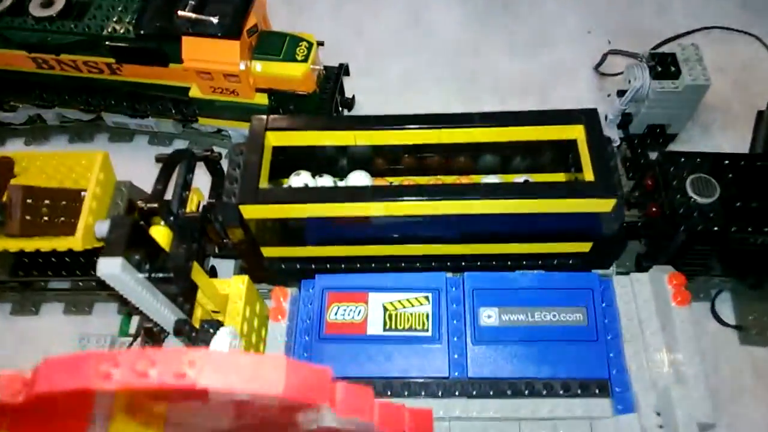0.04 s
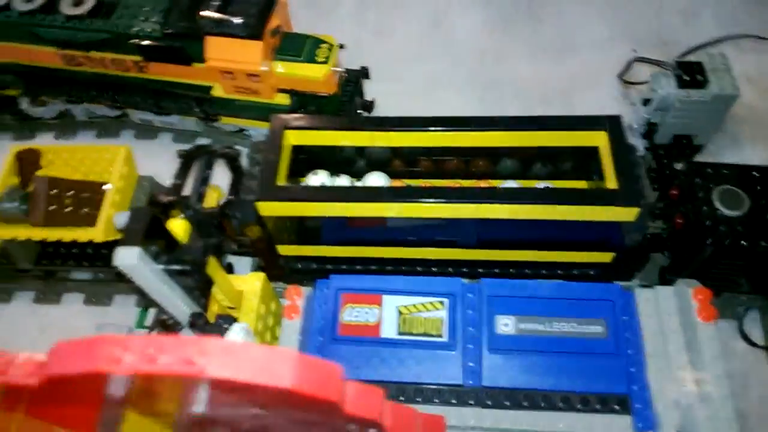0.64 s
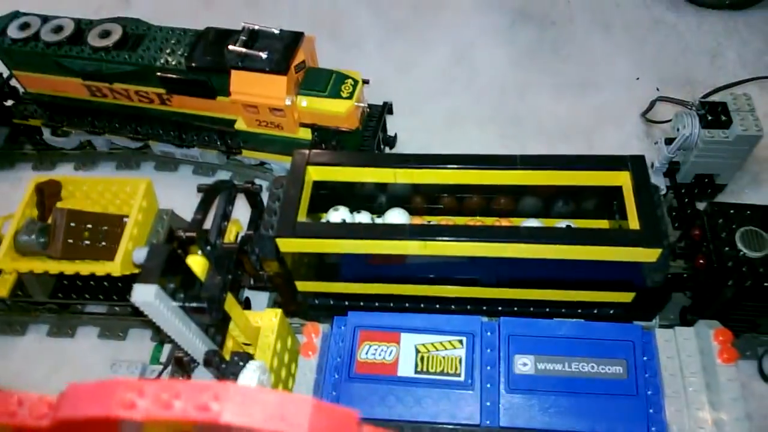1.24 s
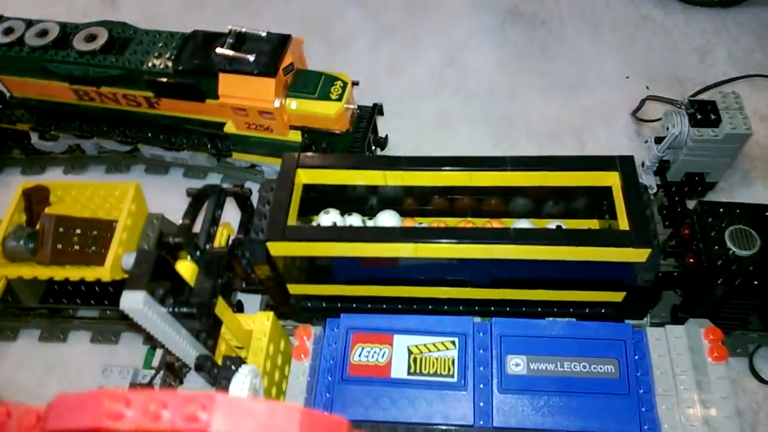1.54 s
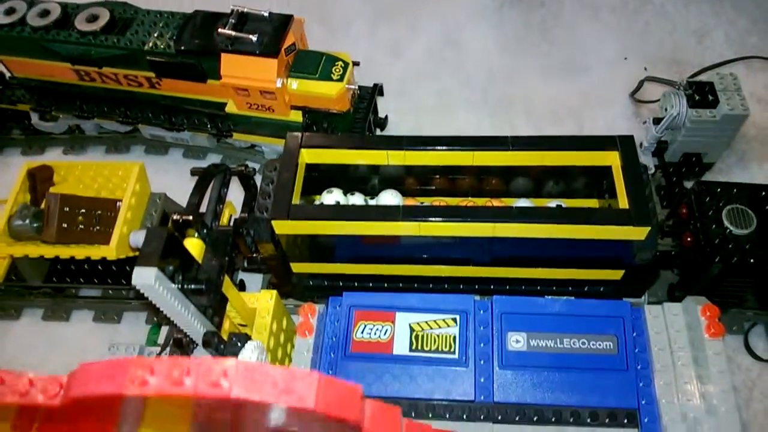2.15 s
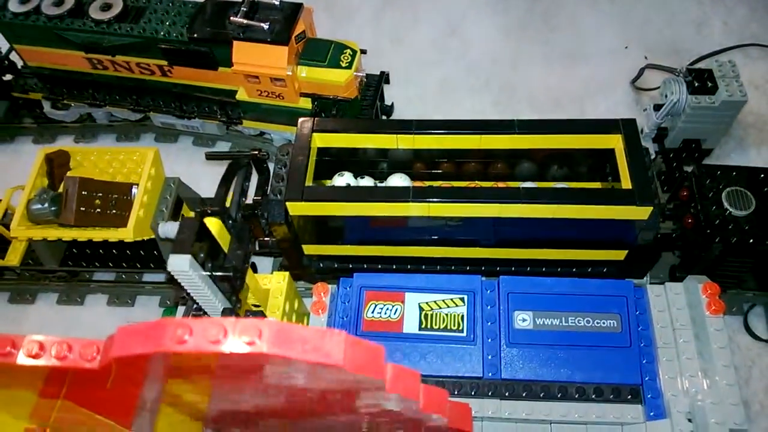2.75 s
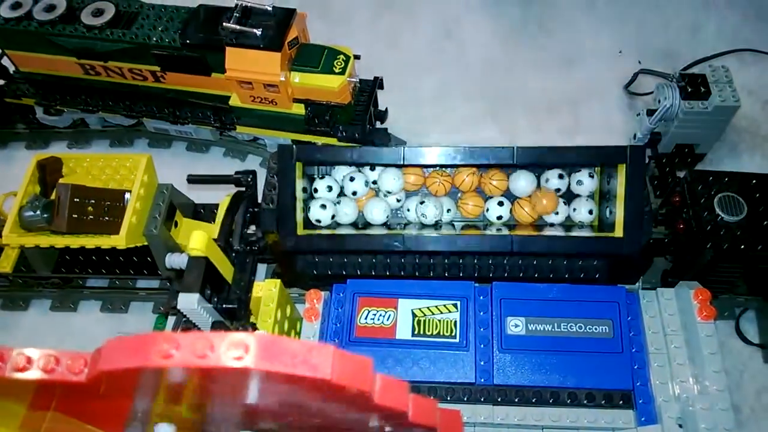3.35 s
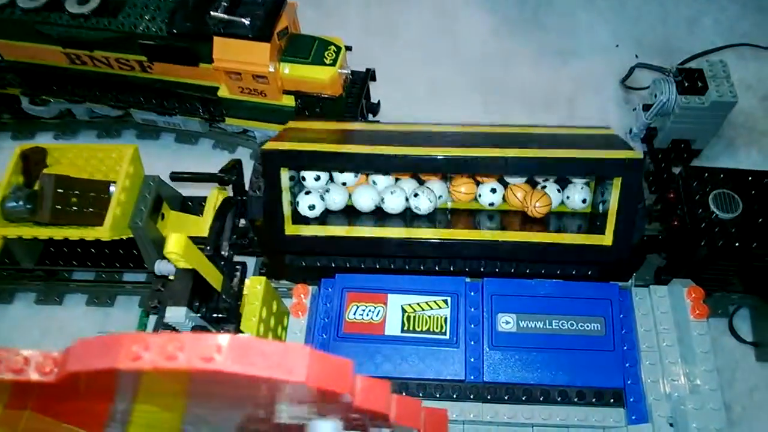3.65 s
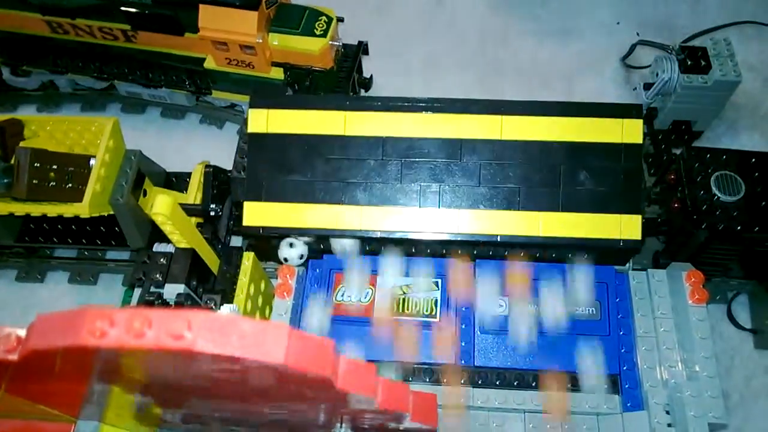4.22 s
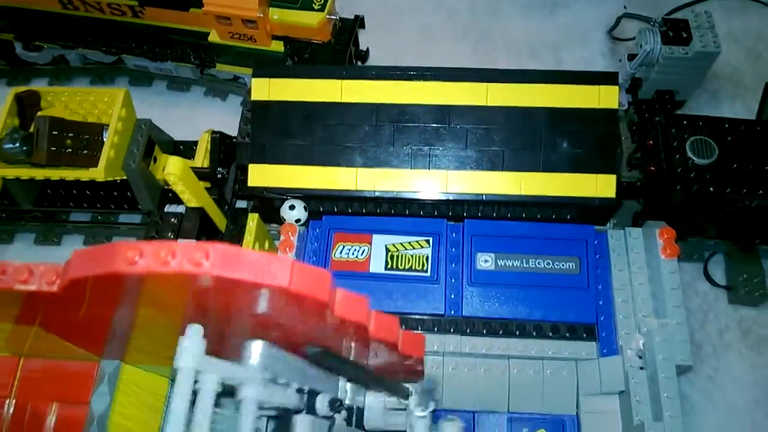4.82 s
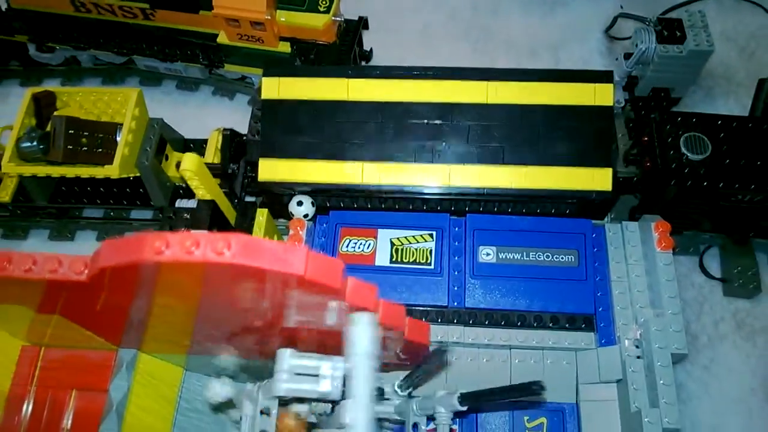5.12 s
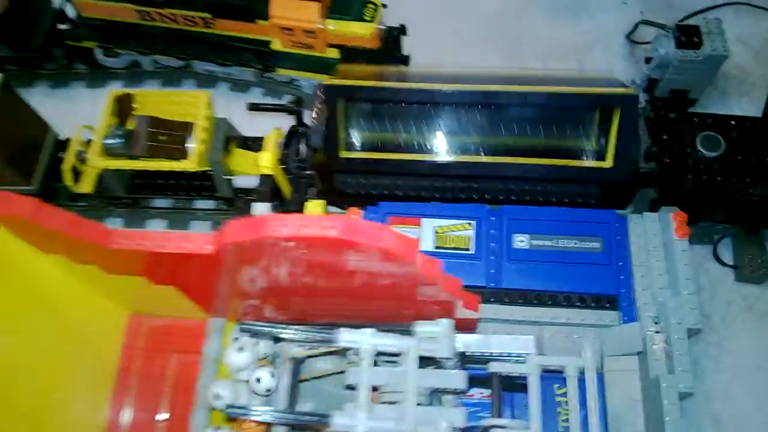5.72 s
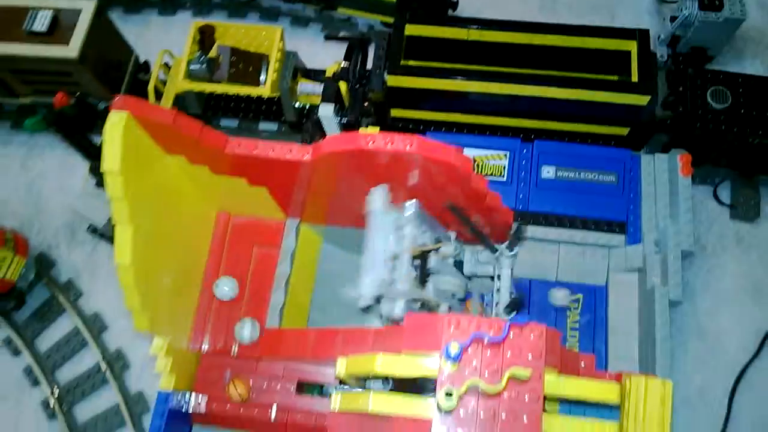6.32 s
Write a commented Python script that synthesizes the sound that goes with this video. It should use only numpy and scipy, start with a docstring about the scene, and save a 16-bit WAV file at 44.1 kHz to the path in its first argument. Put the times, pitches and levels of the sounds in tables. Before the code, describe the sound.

Close by in a small room, the plastic gears of a motorised toy brick machine skip about nine times a second, scraping and rattling in four runs with short breaks. Midway a bin turns over, and little hard balls shift and pour onto a ringing plastic ramp. They roll on, a lift thuds once on the hollow base, and the clicking resumes with more balls clattering. A faint motor hum lies underneath.

```python
"""Plastic gears skipping about nine times a second, in runs with short breaks: a motorised toy brick
machine on a table, close by in a small room. Each skip is a scrape of tooth over tooth, then a rattle
of loose parts. Midway a bin turns over; its little balls shift, pour onto a ringing plastic ramp,
roll down and are lifted on. The lift thuds once on the hollow base.
Underneath: room air, a faint motor hum and a thin hiss that comes and goes."""
import sys
import numpy as np
from scipy import signal
from scipy.fft import rfft, irfft
from scipy.io import wavfile
from scipy.ndimage import uniform_filter1d

SR = 44100
rng = np.random.default_rng(int(sys.argv[2]) if len(sys.argv) > 2 else 0)


def to_wav(s):
    """Save 16-bit WAV."""
    ch = np.atleast_2d(s).T  # columns
    pcm = np.round(np.clip(ch, -1, 1) * 32767)  # PCM
    wavfile.write(sys.argv[1], SR, pcm.astype(np.int16))


N = 285327

# Levels are relative within a table; the functions set the mix.
# Spectra: (frequency [Hz], level [dB])
AIR_SPECTRUM = [(25, -2.5), (70, 1), (130, -9.5), (300, -5), (550, -1), (800, -4.5), (1300, -5),
                (4000, -14.5), (5000, -2), (6000, -19), (9500, -15), (12000, -43), (16000, -26)]
HISS_SPECTRUM = [(300, -10), (2000, -9.5), (6000, -11), (6900, -4.5), (7800, -17), (12000, -18),
                 (13400, -12), (14000, -4.5), (14450, -13), (15000, -12), (16000, -23)]
TABLETOP_SPECTRUM = [(20, -4), (60, 1), (120, 2), (220, 1), (400, -1), (1500, -43), (16000, -80)]
BIN_SPECTRUM = [(150, -34), (500, -31), (1000, -15), (1300, 2), (1480, 3), (1750, 1.5), (2150, -14),
                (3000, -4.5), (4200, -9), (6000, -17.5), (16000, -39)]
RAMP_SPECTRUM = [(40, -34), (190, -25.5), (270, -12), (500, -6), (700, 3), (950, 0), (1300, -2.5),
                 (1850, 0.5), (2600, -7), (4500, -8), (6500, -14.5), (10000, -21.5), (16000, -29)]
CLICK_SPECTRUM = [(300, -36), (1500, -10), (3200, 16.5), (5000, -13), (7000, 4), (10000, -2.5), (14000, -2),
                  (16000, -10)]
CHANNEL_SPECTRUM = [(150, -31), (400, -8.5), (800, -2), (1600, 3), (2300, -4.5), (3500, -6), (5000, -9.5),
                    (7000, -14.5), (10000, -25), (16000, -39)]
AXLE_SPECTRUM = [(150, -25.5), (600, -13.5), (1080, -4.5), (1450, -14), (1900, 1), (2300, 2), (3600, -2.5),
                 (4800, 1), (6000, -16), (8000, -15), (11000, -24.5), (16000, -28.5)]
SNAP_SPECTRUM = [(150, -33), (600, -23.5), (1100, -16.5), (1500, -18), (2200, -3), (3500, -2), (4800, 10.5),
                 (5900, -5.5), (9000, -6), (12000, -17), (16000, -33)]
RATTLE_SPECTRUM = [(150, -36.5), (500, -21), (1100, -11.5), (1450, -13.5), (2200, -4.5), (3600, -4.5),
                   (4300, -1), (4800, 4), (5600, -13), (8000, -14.5), (11000, -21), (16000, -27.5)]
SCRAPE_SPECTRUM = [(150, -54), (500, -25.5), (800, -28), (1120, -12), (1500, -21.5), (2100, -2), (2600, -8),
                   (3600, -5.5), (4250, 0.5), (4900, 2), (5800, -9.5), (9200, -8), (11000, -18),
                   (16000, -35)]
# Room decay: (frequency [Hz], T60 [s])
ROOM_DECAY = [(200, 0.15), (1000, 0.34), (4000, 0.06), (12000, 0.16)]
# Modes: (frequency [Hz], level [dB], T60 [s])
BASE_MODES = [(432, -2.5, 0.066), (474, 2, 0.052), (593, -4, 0.035)]
RAMP_MODES = [(320, -14, 0.18), (386, 2, 0.16), (581, 3, 0.24), (616, 3, 0.17), (701, -4.5, 0.26),
              (904, -11.5, 0.26), (873, -15, 0.14), (1254, -4.5, 0.08), (1370, -8, 0.3), (1670, -21, 0.079),
              (1670, -21, 0.1), (1932, 9, 0.11), (2600, -46, 0.16)]
# Spans of activity: (time [s], length [s], level [dB])
HISS_SPANS = [(0.0, 0.7, -58), (1.57, 0.93, -62), (2.52, 0.9, -51), (3.45, 0.9, -50), (5.03, 1.1, -50.5)]
HEAP_SLIDES = [(3.255, 0.01, -50), (3.335, 0.034, -29.5), (3.455, 0.01, -41), (3.55, 0.085, -44),
               (3.87, 0.13, -36.5), (4.03, 0.12, -25.5)]
RAMP_SPILLS = [(4.05, 0.22, -33), (4.285, 0.22, -25), (4.57, 0.098, -29.5), (4.795, 0.035, -32),
               (5.69, 0.067, -32), (5.86, 0.064, -34), (5.975, 0.057, -27), (6.1, 0.14, -35),
               (6.335, 0.018, -32)]
CHANNEL_ROLLS = [(4.92, 0.1, -43), (5.07, 0.18, -39), (5.44, 0.12, -47)]
FREE_SPINS = [(0.0, 0.0076, -22.5), (0.83, 0.028, -30), (0.97, 0.031, -37), (1.567, 0.049, -33.5),
              (2.01, 0.034, -32), (2.915, 0.085, -30.5), (3.523, 0.083, -29.5), (3.96, 0.029, -33),
              (4.07, 0.06, -27), (4.88, 0.045, -29.5), (6.29, 0.02, -27.5)]
# Jolts into the tabletop: (time [s], level [dB])
TABLETOP_JOLTS = [(4.15, -56), (4.388, -53), (4.459, -51), (4.576, -50), (4.599, -51), (5.71, -56.5),
                  (6.021, -58), (6.207, -53.5)]
# Single impacts: (time [s], level [dB], treble tilt [dB])
BIN_BUMPS = [(3.258, -31, -13), (3.305, -45, -10), (3.344, -28, -14), (3.358, -25, -8),
             (3.418, -21.5, -2.5), (3.446, -34, 2), (3.461, -34, -3), (3.547, -25, 3), (3.604, -26.5, -5),
             (4.037, -19, -21), (4.069, -32, -4), (4.11, -16, 12)]
RAMP_KNOCKS = [(4.2004, -20, 7), (4.2946, -19.5, 6), (4.3135, -12, -2), (4.3361, -14, 9), (4.3455, -10, 3),
               (4.3936, -8, 1), (4.4077, -16.5, 28), (4.4233, -16, -11), (4.4407, -12.5, 5.5),
               (4.4636, -21, 5), (4.4888, -20, -3), (4.5297, -17, 13), (4.5761, -14, 8),
               (4.6599, -19.5, -10), (4.798, -21, 6), (4.8109, -24.5, 16), (4.9844, -32, 6),
               (5.0685, -28.5, 4), (5.2655, -28, 5), (5.2892, -23.5, 0), (5.3629, -23.5, 7),
               (5.3999, -30, -1), (5.4376, -31.5, -8), (5.464, -31.5, -9), (5.4903, -32, -6),
               (5.9499, -20, 2), (5.9828, -20, 3), (5.9863, -19.5, 3), (6.0397, -14.5, 8),
               (6.2652, -17.5, 9)]
SNAPS_AND_CLICKS = [(0.0029, -17.5, -10), (0.1196, -20, 12), (0.2281, -17, -3.1), (0.3446, -15, 1),
                    (0.4161, -23.5, -13), (0.5071, -34, -13), (0.5767, -13.5, 7), (0.7021, -22.5, -8),
                    (0.8078, -18, -6), (0.8326, -20, -8), (0.9296, -17.5, -3.5), (1.0927, -33, -9),
                    (1.1974, -31.5, -12), (1.2495, -49, -6), (1.5697, -24, -7), (1.5831, -23, -8),
                    (1.601, -24.5, -7), (1.6286, -20.5, -8.5), (1.6999, -11, -6), (1.8408, -16.5, -9),
                    (1.8989, -26.5, -0.3), (2.017, -14, 13), (2.027, -20, -13), (2.0582, -9.5, -3),
                    (2.1829, -20, -2), (2.2957, -17.5, -0.8), (2.3682, -31, -8), (2.4114, -11.5, -6),
                    (2.4407, -25, -7), (2.5393, -18.5, 2), (2.647, -13, -5.5), (2.8374, -19, -8),
                    (2.918, -20.5, 12), (2.9772, -21, -7), (3.137, -16, -1), (3.5749, -19.5, -7),
                    (3.6042, -19, -12), (3.6484, -24, -9), (3.7769, -20.5, -2), (3.9168, -10.5, -4),
                    (3.9398, -13.5, -10), (4.0576, -9.5, -1), (4.1776, -13, -14), (5.6913, -17, 13),
                    (5.7096, -15, 23), (5.7202, -17, 26), (5.8781, -16, 18), (6.0777, -15, 44),
                    (6.2032, -14, 37), (6.2188, -14.5, 21), (6.3415, -17, 8)]
# Motor on: (time [s], length [s], chatter level [dB], hum level [dB])
MOTOR_RUNS = [(0.0, 1.1, -42, -70.5), (1.59, 1.39, -42, -68.5), (3.511, 1.34, -41, -67.5),
              (5.52, 0.97, -42.5, -71.5)]
# Gear skips: (time [s], length [s], scrape level [dB], rattle level [dB])
GEAR_SKIPS = [(0.079, 0.013, -17, -25.5), (0.199, 0.018, -17, -26.5), (0.307, 0.017, -17, -26.5),
              (0.427, 0.014, -18.5, -27), (0.543, 0.017, -16.5, -29), (0.66, 0.013, -17, -31),
              (0.778, 0.011, -17, -35.5), (0.89, 0.019, -18, -29), (1.023, 0.011, -19, -51),
              (1.683, 0.0092, -17.5, -28.5), (1.813, 0.011, -20.5, -30), (1.926, 0.02, -21, -27.5),
              (2.043, 0.019, -20, -28), (2.145, 0.018, -19, -28), (2.269, 0.0099, -17, -29.5),
              (2.387, 0.015, -20, -30.5), (2.497, 0.021, -18, -26), (2.616, 0.014, -18, -28.5),
              (2.732, 0.026, -19.5, -26.5), (2.85, 0.013, -19, -27), (3.049, 0.011, -20.5, -43.5),
              (3.675, 0.013, -18.5, -26.5), (3.793, 0.015, -18, -25), (3.909, 0.013, -17, -26.5),
              (4.029, 0.017, -18, -30), (4.139, 0.025, -19.5, -24.5), (4.258, 0.017, -17.5, -32),
              (4.365, 0.025, -21.5, -25), (4.488, 0.014, -18.5, -28), (4.597, 0.021, -21.5, -22.5),
              (4.72, 0.021, -20.5, -28), (4.836, 0.031, -21, -30.5), (5.547, 0.006, -19.5, -27),
              (5.661, 0.012, -18.5, -27.5), (5.776, 0.018, -18, -30.5), (5.89, 0.02, -19.5, -29.5),
              (6.009, 0.023, -17, -30), (6.118, 0.024, -21, -27), (6.233, 0.017, -21, -27.5),
              (6.35, 0.021, -19, -27.5)]


def gain_of(db):
    """Decibels to amplitude factor."""
    return 10 ** (np.asarray(db) / 20)


def unit_rms(x):
    """Scale to rms 1."""
    return x / np.sqrt(np.mean(x ** 2) + 1e-20)


def wander(count, width):
    """Noise smoothed over width points; rms 1."""
    return unit_rms(uniform_filter1d(rng.standard_normal(count), size=width))


def lookup(table, hz):
    """Interpolate over log frequency."""
    table_hz, value = np.transpose(table)
    return np.interp(np.log(hz + 1), np.log(table_hz + 1), value)


def add(mix, time_s, sound):
    """Mix a sound in at time_s."""
    part = mix[max(round(time_s * SR), 0):][:len(sound)]
    part += sound[:len(part)]


def envelope(spans, rise_s, fall_s):
    """Gain per sample: each span rises, holds and decays; powers add."""
    power = np.zeros(N)
    for time_s, length_s, db in spans:
        t = np.arange(N) / SR
        gain = gain_of(db) * np.minimum(t / rise_s, 1) * np.exp(-np.maximum(t - length_s, 0) / fall_s)
        add(power, time_s, gain ** 2)
    return np.sqrt(power)


def body(spectrum, tilt_db=0., ripple_db=0., size=2048):
    """Minimum-phase response, energy 1; tilt pivots at 3 kHz, ripple adds narrow random modes."""
    hz = np.fft.rfftfreq(size, 1 / SR)
    modes = wander(len(hz), 7)
    lean = np.tanh(np.log((hz + 1) / 3000))
    detune = np.exp(0.0054 * ripple_db * rng.standard_normal())  # varies with contact point
    level_db = lookup(spectrum, hz * detune) + tilt_db * lean + ripple_db * modes
    cepstrum = irfft(np.log(gain_of(level_db)))
    cepstrum[1:size // 2] *= 2
    cepstrum[size // 2 + 1:] = 0
    response = irfft(np.exp(rfft(cepstrum)))
    return response / np.linalg.norm(response)


def coloured_noise(spectrum, count=N, tilt_db=0., ripple_db=0.):
    """White noise shaped by a spectrum."""
    return signal.oaconvolve(rng.standard_normal(count), body(spectrum, tilt_db, ripple_db))[:count]


def buzz(decay_s, shape=0.99):
    """Force of a loose plastic contact, energy 1; shape above 1 holds, then stops short."""
    t = np.arange(SR // 25) / SR
    force = rng.standard_normal(len(t)) * np.exp(-(t / decay_s) ** shape)
    return force / np.linalg.norm(force)


def clatter(gain, spectrum, rate_hz, spread_db, decay_s, ripple_db, parts=8):
    """Random small impacts on several like parts; rms follows gain."""
    hits = rng.random(N) < rate_hz / SR
    force = hits * gain_of(spread_db * np.minimum(rng.exponential(1, N), 3))
    local_power = abs(uniform_filter1d(force ** 2, size=1500))
    force /= np.sqrt(local_power + .1 * np.mean(force ** 2))  # evens out the loudness of the random hits
    struck = rng.integers(0, parts, N)
    out = np.zeros(N)
    for part in range(parts):
        ring = np.convolve(buzz(decay_s), body(spectrum, ripple_db=ripple_db))
        out += signal.oaconvolve(force * gain * (struck == part), ring / np.linalg.norm(ring))[:N]
    return out


def impacts(rows, spectrum, decay_s, ripple_db, crack, shape):
    """A crack and a short buzz through a body, each scaled by the rms of its first 3 ms."""
    out = np.zeros(N)
    for time_s, db, tilt_db in rows:
        force = buzz(decay_s, shape)
        force[0] += crack
        sound = signal.fftconvolve(force, body(spectrum, tilt_db, ripple_db))
        onset_rms = np.sqrt(np.mean(sound[:3 * SR // 1000] ** 2))
        add(out, time_s, gain_of(db) * sound / onset_rms)
    return out


def room_tail(x, rise_s=0.0041):
    """Short diffuse tail; each band decays at its own rate."""
    hz, t, bands = signal.stft(rng.standard_normal(SR // 2), SR, nperseg=256)
    t60_s = lookup(ROOM_DECAY, hz)[:, None]
    tail = signal.istft(bands * gain_of(-60 * t / t60_s), SR, nperseg=256)[1]
    tail *= np.minimum(np.arange(len(tail)) / SR / rise_s, 1)
    return signal.fftconvolve(x, tail / np.linalg.norm(tail))[:N]


def room_air(level_db=-58.5):
    """Steady noise of still air."""
    return gain_of(level_db) * coloured_noise(AIR_SPECTRUM)


def hiss():
    """Thin high hiss, on and off."""
    return envelope(HISS_SPANS, rise_s=0.071, fall_s=0.073) * coloured_noise(HISS_SPECTRUM)


def motor_hum(pitch_hz=177, swell_db=1.5):
    """The running motor hums, wavering in pitch and level."""
    hz = pitch_hz * (1 + 0.025 * wander(N, 4000))
    swell = gain_of(swell_db * wander(N, 12000))
    runs = [(time_s, length_s, db) for time_s, length_s, _, db in MOTOR_RUNS]
    tone = np.sqrt(2) * np.sin(2 * np.pi * np.cumsum(hz) / SR)
    return envelope(runs, rise_s=0.011, fall_s=0.21) * swell * tone


def tabletop_jolts():
    """Heavy jolts shake the table."""
    out = np.zeros(N)
    for time_s, db in TABLETOP_JOLTS:
        shake = signal.fftconvolve(buzz(decay_s=0.0062), body(TABLETOP_SPECTRUM))
        add(out, time_s, gain_of(db) * unit_rms(shake))
    return out


def lift_thud(time_s=5.362, gain_db=-22, rise_s=0.0045):
    """The lift lands; the hollow base rings."""
    out, t = np.zeros(N), np.arange(SR // 5) / SR
    ring = sum(gain_of(db - 60 * t / t60_s) * np.sin(2 * np.pi * hz * t) for hz, db, t60_s in BASE_MODES)
    onset = 1 - np.exp(-(t / rise_s) ** 2)
    add(out, time_s, gain_of(gain_db) * ring * onset)
    return out


def balls_in_channel():
    """Balls roll along the lift's channel."""
    gain = envelope(CHANNEL_ROLLS, rise_s=0.01, fall_s=0.012)
    return clatter(gain, CHANNEL_SPECTRUM, rate_hz=970, spread_db=4, decay_s=0.0013, ripple_db=1.5)


def balls_in_bin():
    """The heap slides as the bin turns; single balls strike the wall."""
    slide = envelope(HEAP_SLIDES, rise_s=0.0034, fall_s=0.018)
    shifting = clatter(slide, BIN_SPECTRUM, rate_hz=490, spread_db=3, decay_s=0.0016, ripple_db=3)
    bumps = impacts(BIN_BUMPS, BIN_SPECTRUM, decay_s=0.0031, ripple_db=1, crack=0.13, shape=0.76)
    return gain_of(-2) * shifting + gain_of(-4) * bumps


def ramp_ring(strikes):
    """The ramp's plate modes ring on after each strike."""
    t = np.arange(SR // 4) / SR
    response = np.zeros(len(t))
    for hz, db, t60_s in RAMP_MODES:
        unit_peak = 2 * np.log(1000) / (t60_s * SR)  # cancels the gain at resonance
        response += unit_peak * gain_of(db - 60 * t / t60_s) * np.sin(2 * np.pi * hz * t)
    return signal.fftconvolve(strikes, response)[:N]


def balls_on_ramp():
    """Batches of hard balls hit the ramp, bounce and click together."""
    spill = envelope(RAMP_SPILLS, rise_s=0.0053, fall_s=0.084)
    pour = clatter(spill, RAMP_SPECTRUM, rate_hz=450, spread_db=2, decay_s=0.0014, ripple_db=2.5,
                   parts=14)
    clicks = clatter(spill, CLICK_SPECTRUM, rate_hz=170, spread_db=15.5, decay_s=0.0014, ripple_db=1.5)
    knocks = impacts(RAMP_KNOCKS, RAMP_SPECTRUM, decay_s=0.0016, ripple_db=2.5, crack=0.2, shape=0.87)
    strikes = gain_of(1.5) * pour + gain_of(-3) * knocks
    return strikes + gain_of(-5.5) * ramp_ring(strikes) + gain_of(-1) * clicks


def axle_chatter(spin_up_s=0.042):
    """Axles chatter under the motor, harder after each skip and when spinning free of the load."""
    runs = [(time_s, length_s, db) for time_s, length_s, db, _ in MOTOR_RUNS]
    coasts = [(time_s, spin_up_s, rattle_db - 4.5) for time_s, _, _, rattle_db in GEAR_SKIPS]
    idle = envelope(runs, rise_s=0.011, fall_s=0.024)
    coast = envelope(coasts, rise_s=spin_up_s, fall_s=0.045)
    free = envelope(FREE_SPINS, rise_s=0.0041, fall_s=0.018)
    gain = gain_of(-3.5) * np.sqrt(idle ** 2 + coast ** 2 + free ** 2)
    return clatter(gain, AXLE_SPECTRUM, rate_hz=700, spread_db=4, decay_s=0.0044, ripple_db=0, parts=6)


def snaps_and_clicks():
    """Single sharp snaps of the gears; near the end, bright hard clicks of balls entering the lift."""
    hits = impacts(SNAPS_AND_CLICKS, SNAP_SPECTRUM, decay_s=0.0031, ripple_db=0.45, crack=0.12,
                   shape=1.3)
    return gain_of(-4.5) * hits


def gear_rattle(hold_s=0.044, fall_s=0.015):
    """After each skip the gear train springs back and rattles until it settles."""
    gain, t = np.zeros(N), np.arange(SR // 7) / SR
    for time_s, length_s, _, db in GEAR_SKIPS:
        onset = np.clip(2 * t / length_s - 1, 0, 1)
        settle = np.exp(-np.maximum(t - hold_s, 0) / fall_s)
        add(gain, time_s, gain_of(db) * onset * settle)
    return clatter(gain, RATTLE_SPECTRUM, rate_hz=600, spread_db=4, decay_s=0.0017, ripple_db=1.5)


def gear_scrapes(lead_s=0.0038, fall_s=0.0042, grain=0.19):
    """Tooth rides over tooth: dense friction bites, holds and lets go."""
    out, t = np.zeros(N), np.arange(SR // 12) / SR
    for time_s, length_s, db, _ in GEAR_SKIPS:
        bite = np.minimum(t / (2 * lead_s), 1) ** 2.17
        release = np.exp(-np.maximum(t - lead_s - 0.91 * length_s, 0) / fall_s)
        grip = np.exp(grain * wander(len(t), 60))
        friction = coloured_noise(SCRAPE_SPECTRUM, len(t), 1.2 * rng.standard_normal(), ripple_db=2.5)
        # even motor pressure keeps the friction level steady
        friction /= np.sqrt(abs(uniform_filter1d(friction ** 2, size=150)) + 1e-9)
        scrape = bite * release * grip * friction
        scrape *= np.sqrt(length_s * SR) / np.linalg.norm(scrape)
        add(out, time_s - lead_s, gain_of(db) * scrape)
    return gain_of(-0.43) * out


def scene():
    """The machine close by, with a little room; mono."""
    background = room_air() + hiss() + motor_hum()
    handling = tabletop_jolts() + lift_thud() + balls_in_channel() + balls_in_bin() + balls_on_ramp()
    gears = axle_chatter() + snaps_and_clicks() + gear_rattle() + gear_scrapes()
    reverb = room_tail(gain_of(-20) * gears + gain_of(-16) * handling)
    return (background + handling + gears + reverb)[None]


def record(dry, ceiling=0.92, cutoff_hz=16100):
    """The microphone rounds off the highest peaks; then a low-pass."""
    rounded = dry / (1 + abs(dry / ceiling) ** 4) ** .25
    lowpass = signal.firwin(401, cutoff_hz, window=("kaiser", 9), fs=SR)
    return signal.oaconvolve(rounded, lowpass[None], "same")


dry = scene()
out = record(dry)
to_wav(out)
```